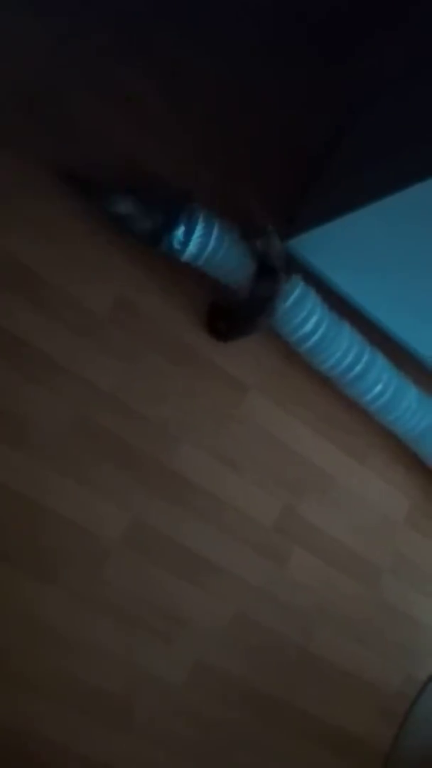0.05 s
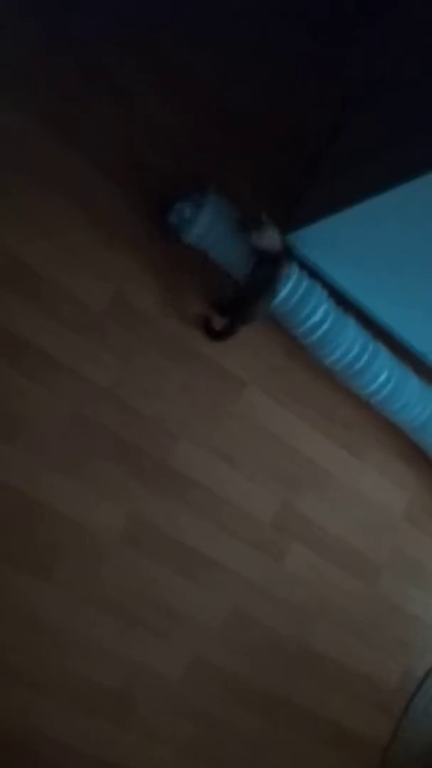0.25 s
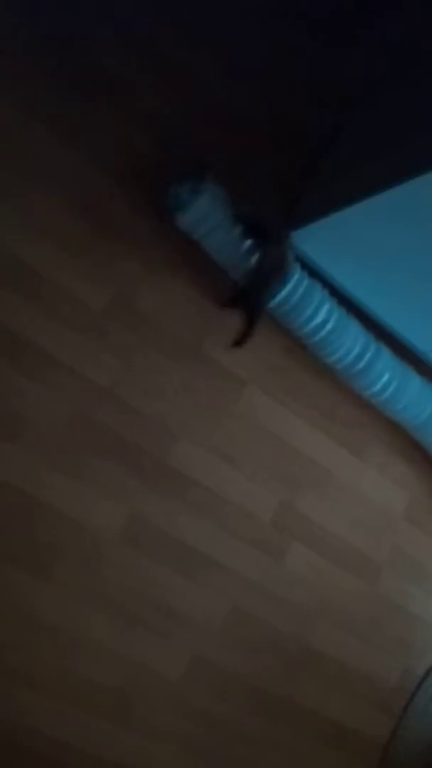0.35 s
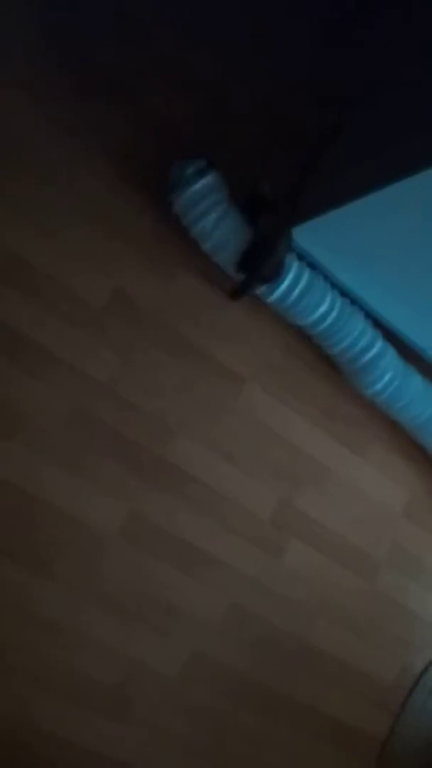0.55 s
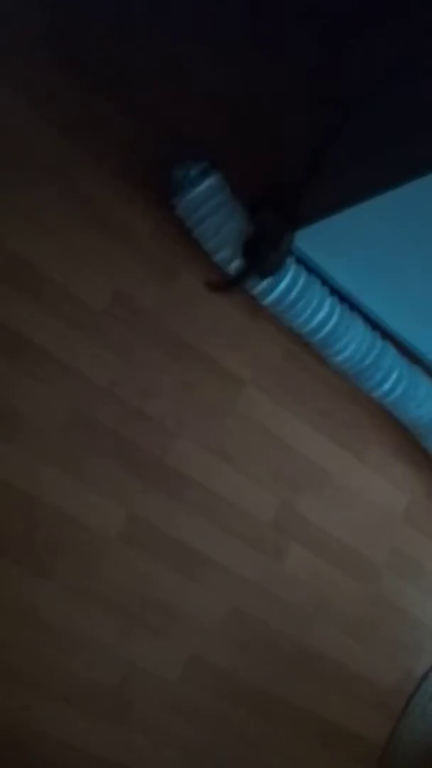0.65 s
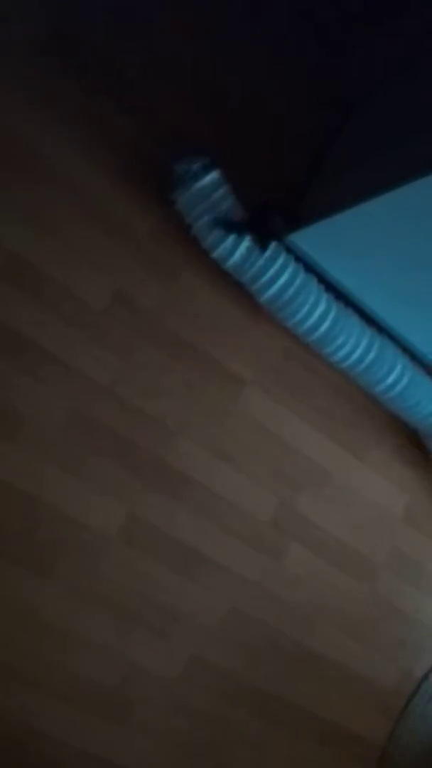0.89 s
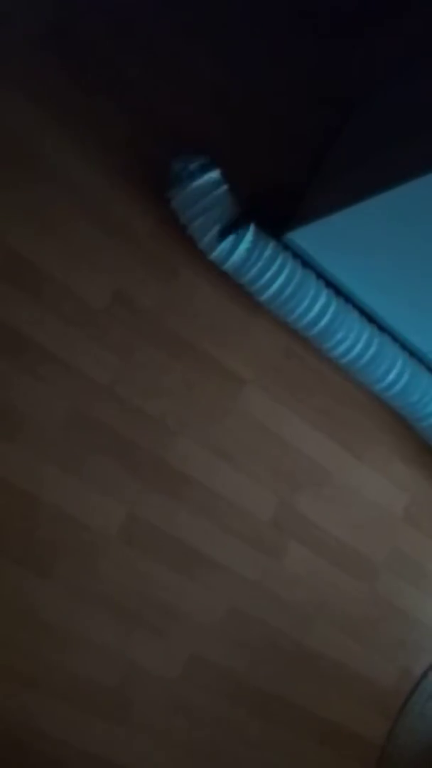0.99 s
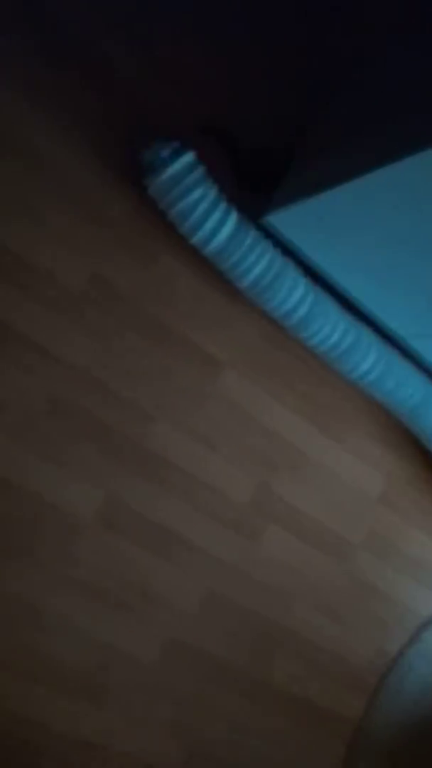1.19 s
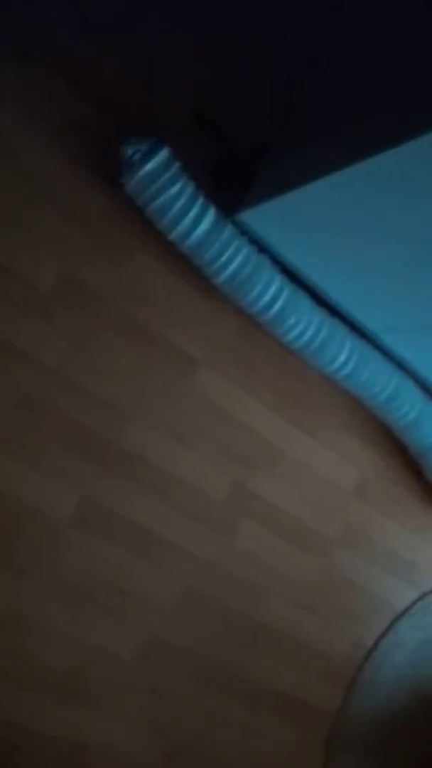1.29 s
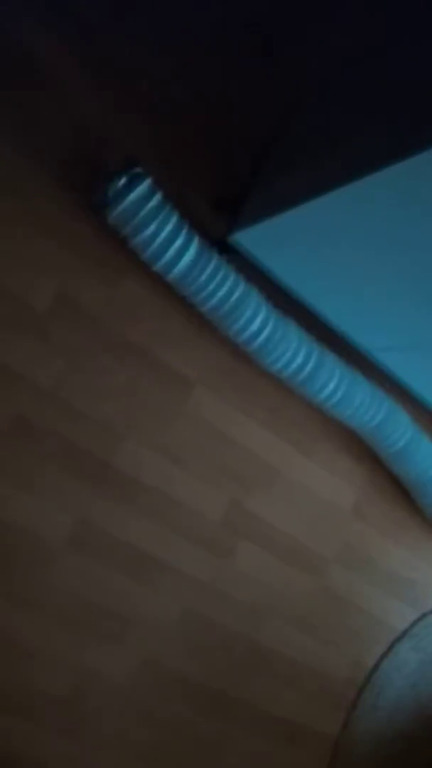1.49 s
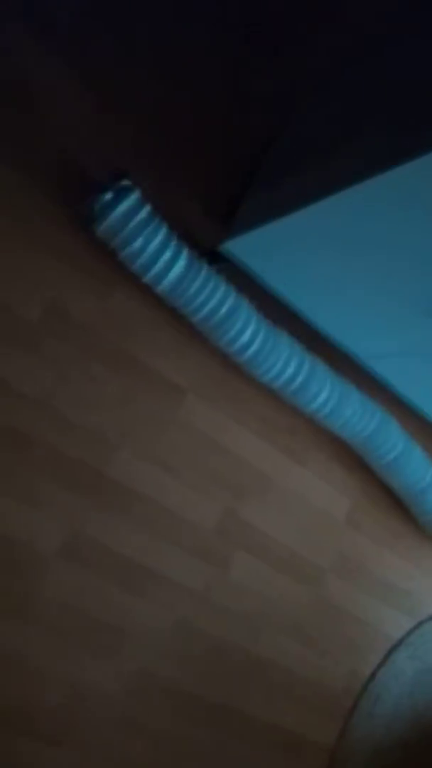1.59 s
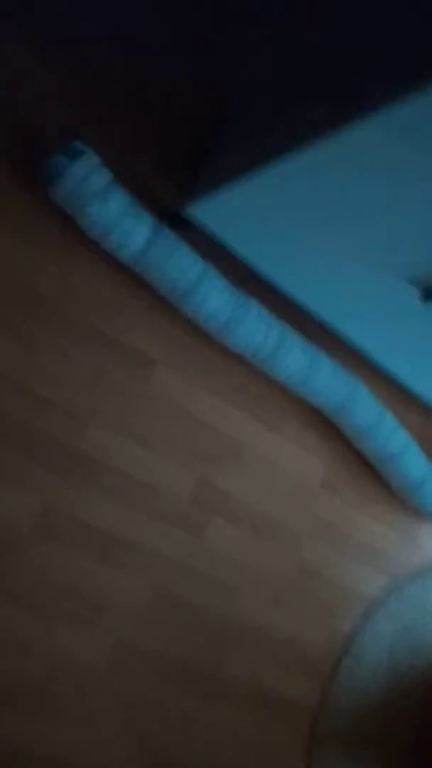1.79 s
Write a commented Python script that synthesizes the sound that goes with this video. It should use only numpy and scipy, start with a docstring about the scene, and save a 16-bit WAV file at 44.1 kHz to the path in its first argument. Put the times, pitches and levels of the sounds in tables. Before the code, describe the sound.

Crinkling, clicking plastic tube with claw scratches and hollow knocks from a ferret crawling inside.

```python
"""A quiet, bare room with a laminate floor, where a ferret scrambles through a ribbed plastic tube.
The tube's wall snaps and crinkles, claws scratch and knock on it, and paws thud through to the floor.
The air inside rings differently as the body moves along and plugs it.
The room blurs every blow into a short tail."""
import sys
import numpy as np
from scipy import signal
from scipy.fft import rfft, irfft
from scipy.io import wavfile

SR = 44100
rng = np.random.default_rng(int(sys.argv[2]) if len(sys.argv) > 2 else 0)


def wrap_up_sound(samples):
    """Save the sound to the file named by the first command line argument, as 16-bit audio."""
    columns = np.atleast_2d(samples).T
    # keep every value between -1 and 1, then stretch to whole-number steps
    tamed = np.clip(columns, -1, 1)
    steps = np.round(tamed * 32767).astype(np.int16)
    wavfile.write(sys.argv[1], SR, steps)


N = 81585

# The bright tone of the plastic wall: f/Hz, level/dB
WALL_TONE = [(760, -41.5), (1300, 0.5), (1890, -2.5), (4140, -8.5), (4560, -13), (5340, -8), (6750, -7.5),
             (8200, -6.5), (10200, 0), (11600, -1.5), (15500, -11), (16000, -8), (16500, -54)]
# The duller tone of the hollow tube: f/Hz, level/dB
HOLLOW_TONE = [(420, -7), (600, -9.5), (850, 2), (1120, -5.5), (1450, -6), (2000, -5), (2700, -14.5),
               (3600, -22.5)]
# The notes at which floor and tube ring under the paws: f/Hz, level/dB, time to fade by 60 dB/s
FLOOR_NOTES = [(103.7, -3.5, 0.24), (116, 0, 0.16), (137.3, 2, 0.109), (168.7, 0.5, 0.16),
               (209.8, 4, 0.058), (243.8, -2.5, 0.19), (297.8, 7.5, 0.079), (327.4, 6.5, 0.095),
               (369, 10.5, 0.07), (428, 7.5, 0.061), (505.7, 9, 0.048), (547.7, 6, 0.1), (616, 5, 0.07)]


def from_db(db):
    """Turn decibels into a number to multiply by."""
    return 10 ** (np.asarray(db) / 20)


def rms_one(x):
    """Scale a sound so that its average strength (rms) is 1."""
    return x / np.sqrt(np.mean(x ** 2) + 1e-20)


def at_hz(points, hz):
    """Read between the rows of a table, with frequency spaced by octaves."""
    freqs, values = np.transpose(points)
    return np.interp(np.log(hz), np.log(freqs), values)


def keep_range(x, kind, hz, order=3):
    """Keep the "low", "high" or "band" part of a sound; a higher order cuts more steeply."""
    return signal.sosfilt(signal.butter(order, hz, kind, fs=SR, output="sos"), x)


def colour(x, tone):
    """Give a sound the tone in a table, falling away steeply beyond its ends."""
    size = 4096
    (low, low_db), (high, high_db) = tone[0], tone[-1]
    table = [(low / 4, low_db - 40)] + list(tone) + [(high * 2, high_db - 30)]
    gains = from_db(at_hz(table, np.arange(size // 2 + 1) * SR / size + 1))
    # Folding the cepstrum (the log spectrum turned into time) stops any ringing ahead of a click.
    cepstrum = irfft(np.log(gains))
    cepstrum[1:size // 2] *= 2
    cepstrum[size // 2 + 1:] = 0
    response = irfft(np.exp(rfft(cepstrum)))
    response /= np.linalg.norm(response)
    return signal.fftconvolve(x, np.array(response, ndmin=x.ndim))[..., :x.shape[-1]]


def ring(clicks, hz, fade_s):
    """Each click starts a pure note that fades by 60 dB in fade_s."""
    decay, angle = from_db(-60 / (fade_s * SR)), 2 * np.pi * hz / SR
    return signal.lfilter([0, np.sin(angle)], [1, -2 * decay * np.cos(angle), decay ** 2], clicks + 1e-18)


def grains(per_s, spread_db):
    """Random clicks of uneven size."""
    sizes = from_db(spread_db * np.minimum(rng.exponential(1, N), 4)) * rng.choice([-1, 1], N)
    return rms_one(sizes * (rng.random(N) < per_s / SR))


def place(start_s, sound):
    """Put one short sound on a silent track."""
    out, i = np.zeros(N + SR), int(start_s * SR)
    out[i:i + len(sound)] = sound
    return out[:N]


def stereo_noise(size, fade_times):
    """Noise in half-octave bands, each fading at its own rate; the bass is alike in both ears."""
    # How alike left and right are in the room: f/Hz, likeness (0 to 1)
    likeness = [(100, 0.83), (250, 0.86), (500, 0.8), (1000, 0.06), (2000, 0.013), (8000, .0)]
    out, t, edges = 0, np.arange(size) / SR, 25 * 2 ** np.arange(0, 9.6, .5)
    white = rng.standard_normal((2, 2, size))
    for k, (low, high) in enumerate(zip(edges, edges[1:])):
        mid, side = keep_range(white[k % 2], "band", [low, high], order=2)
        hz = np.sqrt(low * high)
        alike = at_hz(likeness, hz)
        fade = from_db(-60 * t / at_hz(fade_times, hz))
        out += fade * (np.sqrt(1 + alike) * mid + np.sqrt(1 - alike) * side * [[1], [-1]])
    return out


def hush():
    """The faint, steady noise of the quiet room."""
    # Its tone: f/Hz, level/dB
    tone = [(25, -5), (55, 1.5), (110, -19), (220, -23), (330, -11), (550, 2), (800, -15),
            (2000, -10), (5500, -10.5), (9500, -9), (16000, -26)]
    steady = stereo_noise(N + SR // 4, fade_times=[(1, 1e9)])
    return from_db(-75.5) * rms_one(colour(steady, tone)[:, -N:])


def room(x, tail_db, build_s=0.0026):
    """The room's echoes alone: a smooth tail that builds up quickly and dies away."""
    # How long the room rings: f/Hz, time to fade by 60 dB/s
    fade_times = [(100, 0.19), (300, 0.26), (1000, 0.26), (3000, 0.23), (8000, 0.25), (14000, 0.27)]
    t = np.arange(SR // 2) / SR
    tail = stereo_noise(len(t), fade_times) * (1 - np.exp(-t / build_s)) ** 2
    tail *= from_db(tail_db) / np.sqrt(np.sum(tail ** 2) / 2)
    return signal.fftconvolve(np.atleast_2d(x).mean(0)[None], tail)[:, :N]


def floor_ring(pushes, strengths):
    """Pushes set all the floor's notes ringing, every other one upside down."""
    return sum((-1) ** k * from_db(db) * ring(pushes * strengths[k], hz, fade_s)
               for k, (hz, db, fade_s) in enumerate(FLOOR_NOTES))


def scratches(per_s=250, cycles=49):
    """Tiny claw ticks, each ringing a small patch of the wall at one of eight high pitches."""
    pitches_hz = np.geomspace(9700, 14200, num=8)
    rings = np.array([ring(grains(per_s / 8, spread_db=2.2), hz, cycles / hz) for hz in pitches_hz])
    ear_gains = rng.uniform(.3, 1, (2, 8))
    return rms_one(ear_gains @ rings)


def shuffle():
    """The tube drags: its wall crinkles, its hollow scuffs and the floor rumbles, while claws scratch."""
    # How strong the dragging is: t/s, treble level/dB, middle level/dB, bass level/dB
    drag_levels = [(0.0, -64, -81, -65), (0.118, -64.5, -84, -66), (0.164, -54.5, -80, -63),
                   (0.242, -46, -61, -50), (0.308, -50, -48.5, -49), (0.396, -48, -44.5, -43.5),
                   (0.55, -46.5, -47, -40), (0.72, -49, -42, -53.5), (0.896, -49.5, -48.5, -44.5),
                   (1.034, -50.5, -51.5, -53), (1.173, -49.5, -49, -56), (1.386, -59, -72, -67),
                   (1.484, -55, -62, -80), (1.618, -56.5, -56, -83), (1.726, -62, -64.5, -107),
                   (1.85, -88, -88, -92)]
    trims_db, tails_db = (-2.5, -11, -6.5), (16.5, 12, 4.5)   # treble, middle, bass
    times, *levels = np.transpose(drag_levels)
    treble, middle, bass = (from_db(np.interp(np.arange(N) / SR, times, db) + trim - tail)
                            for db, trim, tail in zip(levels, trims_db, tails_db))
    crinkle = treble * colour(np.array([grains(per_s=1100, spread_db=6) for _ in "LR"]), WALL_TONE)
    scuff = middle * colour(grains(per_s=500, spread_db=3), HOLLOW_TONE)
    rumble = bass * rms_one(floor_ring(grains(per_s=500, spread_db=1.5), np.ones(len(FLOOR_NOTES))))
    claws = treble * from_db(tails_db[0] - 11.5) * scratches()
    return claws + sum(x + room(x, db) for x, db in zip((crinkle, scuff, rumble), tails_db))


def thuds(push_s=0.0029, lead_s=0.01216, width_octaves=0.65, trim_db=-5.5):
    """A paw's soft push rings the floor notes near the pitch that suits its weight, never twice alike."""
    # Paws landing: t/s, level/dB, pitch/octaves above 100 Hz
    landings = [(0.067, -43, 1.57), (0.091, -43.5, 1.5), (0.192, -35.5, 1.13), (0.214, -38.5, 1.67),
                (.25, -42, 1.5), (0.314, -41, 2.22), (.37, -41.5, 1.4), (0.374, -42, 0.56),
                (0.411, -58, 0.41), (.43, -38, 1.16), (0.453, -40, 0.51), (0.477, -39, 2),
                (0.519, -31.5, 1.5), (0.535, -43.5, 0.93), (0.548, -36.5, 0.99), (0.569, -48, 1.8),
                (.61, -36.5, 1), (.676, -35.5, 1.47), (0.731, -41, 1.33), (0.769, -40.5, 2.26),
                (0.808, -37.5, 1.33), (0.839, -33.5, 1.94), (0.868, -36, 0.71), (0.901, -41, 0.14),
                (0.948, -39.5, 1.4), (0.986, -35.5, 1.91), (0.993, -39, 0.49), (1.049, -43.5, 1.8),
                (1.089, -44, 2), (1.148, -37.5, 1.09), (1.191, -49.5, 1.75), (1.358, -41, 2.15),
                (1.409, -44.5, 2.6), (1.44, -42, 2.92), (1.46, -72, 2), (1.492, -55, 2.3),
                (1.564, -53.5, 2.14)]
    spots = np.zeros((4, N))   # four spots take turns, each with its own room tail
    push = np.pad(np.hanning(int(push_s * SR) + 3), (0, 10000))
    octaves = np.log2(np.array(FLOOR_NOTES)[:, 0] / 100)
    for k, (s, db, pitch) in enumerate(landings):
        scatter = from_db(rng.normal(0, 2.03, len(FLOOR_NOTES)))
        nearness = np.exp(-.5 * ((octaves - pitch) / width_octaves) ** 2)
        thud = floor_ring(push, scatter * nearness)
        thud = keep_range(thud, "band", [100 * 2 ** (pitch - .9), 100 * 2 ** (pitch + .84)])
        start_s = s - lead_s / 2 ** pitch   # deeper thuds have their push start a little earlier, so each lands on its time
        spots[k % 4] += from_db(db + trim_db) * place(start_s, thud / np.abs(thud).max())
    return sum(x + room(x, tail_db=1) for x in spots)


def knocks(cycles=6.93, upper_ratio=1.757, trim_db=-2.5):
    """A claw hits the tube: a tick and two short, hollow notes whose pitch depends on the spot struck."""
    # Claw hits: t/s, level/dB, f/Hz, upper note/dB, tick/dB (the last two relative to the level)
    hits = [(0.045, -58.5, 2290, -24, 14), (0.071, -55.5, 1560, -12, 21), (0.19, -45.5, 1770, -10, 10),
            (0.237, -40, 560, -17, 14.5), (0.309, -43, 640, -15, -12), (0.329, -41, 626, -27, -8),
            (0.363, -38, 880, -8, 10.5), (0.379, -50, 555, 7, 5), (0.432, -43, 1270, 4, 19.5),
            (0.482, -31.5, 894, -14, 2), (0.52, -47.5, 696, -19, 24), (0.531, -32, 575, -1.5, 8.5),
            (0.538, -34.5, 660, -13, -1), (0.544, -36, 830, -19, -7), (0.604, -37, 535, -2, -3),
            (0.676, -39.5, 1770, -19, 17.5), (0.789, -38.5, 677, -8, 11), (0.84, -32, 650, -19, 10),
            (0.945, -41, 900, -20, -10), (0.992, -36.5, 590, -3.5, 3), (1.093, -45.5, 610, -29, 12),
            (1.152, -40, 900, -10, 5), (1.189, -41, 637, -2, -8), (1.304, -39, 660, -38, 11.5),
            (1.317, -49, 686, -11, 18.5), (1.335, -36.5, 2120, -21, -10), (1.352, -31, 738, -5.5, -6),
            (1.375, -44, 780, -6, -15), (1.479, -40.5, 830, -10, 0), (1.544, -39.5, 870, -16, 12),
            (1.647, -57, 770, -5, 7), (1.757, -52, 1490, -10, 1), (1.783, -45, 903, -4.5, 0)]
    notes, ticks = np.zeros((2, 3, N))   # three spots take turns, each with its own room tail
    click = signal.unit_impulse(6000)
    for k, (s, db, hz, upper_db, tick_db) in enumerate(hits):
        lower, upper = (keep_range(ring(click, f, cycles / f), "band", [f * 0.74, f * 1.51])
                        for f in (hz, hz * upper_ratio))
        notes[k % 3] += from_db(db) * place(s, lower + from_db(upper_db) * upper)
        ticks[k % 3] += place(s, [from_db(db + tick_db)])
    spots = from_db(trim_db) * (notes + colour(ticks, HOLLOW_TONE))
    return sum(x + room(x, tail_db=5.5) for x in spots)


def snaps(rise_s=0.00077, bounce_s=0.004, bounce_db=-7, trim_db=-1):
    """The wall snaps: a brief, bright crack, its bounce off the floor and then the room's tail."""
    # Snaps: t/s, level/dB, room tail relative to the crack/dB, lowest f/Hz, length/s
    wall_snaps = [(0.0493, -49.5, 4.5, 8300, 0.0047), (0.0713, -47, 5, 4860, 0.0026),
                  (0.16, -58, -9, 6000, .002), (0.199, -47, 3.5, 6000, 0.0024),
                  (0.226, -32, -1.5, 8600, 0.0023), (0.242, -37, -12, 6500, 0.0026),
                  (0.3446, -45, 9, 5000, 0.0011), (0.375, -41.5, -3, 5000, .003),
                  (0.4312, -29.5, -4.5, 6000, 0.0021), (0.4827, -45, 8, 5000, 0.0029),
                  (0.517, -36.5, 1, 6000, 0.0034), (0.672, -41.5, 4, 3950, 0.0032),
                  (0.716, -38, -8, 6000, 0.0028), (0.787, -47, 6.5, 5000, .003),
                  (0.8402, -29, -4, 4460, 0.0029), (0.9695, -34, -4, 8000, 0.0027),
                  (0.9922, -36.5, -3, 5000, 0.0038), (1.1027, -49.5, 6.5, 5000, 0.0028),
                  (1.15, -41, 3, 7000, 0.0055), (1.3236, -44.5, -1.5, 5900, 0.0033),
                  (1.3515, -27.5, -2.5, 4440, 0.0025), (1.355, -30.5, -2, 7500, 0.0019),
                  (1.523, -53, 3.5, 7140, 0.0033), (1.5383, -45.5, 2, 5100, .003),
                  (1.5436, -34.5, -2.5, 4000, 0.0021), (1.568, -50, -12, 8000, 0.0009),
                  (1.726, -57, 3.5, 4940, 0.0029)]
    t, cracks, room_clicks = np.arange(1000) / SR, 0, 0
    for s, db, tail_db, low_hz, length_s in wall_snaps:
        noise = np.sign(rng.standard_normal((2, len(t))))
        outline = np.minimum(t / rise_s, 1) * np.exp(-(t / length_s) ** 1.74)
        crack = keep_range(from_db(db + trim_db) * outline * noise, "high", low_hz, order=2)
        cracks += np.array([place(s, ear) + from_db(bounce_db) * place(s + bounce_s, ear)
                            for ear in crack])
        room_clicks += place(s, [from_db(db + trim_db + tail_db) * np.sqrt(length_s * SR)])
    return colour(cracks + room(room_clicks, tail_db=0, build_s=0.0055), WALL_TONE)


def tube_air(x, fade_s=0.049):
    """The air in the tube boosts some pitches and cancels others, depending on where the body plugs it."""
    # Peaks and dips in the tone: start/s, end/s, f/Hz, width/Hz, gain/dB
    peaks_and_dips = [(0, .23, 710, 149, -7), (0, .23, 1043, 59.6, 8.5), (0, .23, 1316, 202, -29),
                      (0, .23, 1494, 80.5, 7), (0, .23, 1700, 120, -16), (0, .3, 2040, 80, 4),
                      (1.44, 1.9, 770, 39.4, 5.5), (1.698, 1.9, 927, 35, 8.5), (1.504, 1.9, 1080, 250, -17),
                      (1.61, 1.9, 1480, 117.5, 5.5), (1.536, 1.7, 2160, 78, 4)]
    t = np.arange(N) / SR
    for start, end, hz, width_hz, gain_db in peaks_and_dips:
        decay = np.exp(-np.pi * width_hz / SR)
        feedback = [1, -2 * decay * np.cos(2 * np.pi * hz / SR), decay ** 2]
        narrow_band = signal.lfilter(np.array([1, 0, -1]) * (1 - decay ** 2) / 2, feedback, x)
        share = np.clip(np.minimum(t - start, end - t) / fade_s + 1, 0, 1)
        x = x + share * (from_db(gain_db) - 1) * narrow_band
    return x


def scene():
    """The ferret's scramble, with its deep bass thinned, over the room's hush."""
    background = hush()
    ferret = tube_air(snaps() + knocks() + thuds() + shuffle())
    ferret *= from_db([[.35], [-.35]])   # a little to the left
    upper = keep_range(ferret, "high", hz=67, order=4)
    deep = keep_range(ferret, "low", hz=60, order=2)
    return background + upper + from_db(-1.5) * deep


def record(dry, cutoff_hz=16700):
    """Cut away the very highest treble."""
    return signal.sosfilt(signal.cheby2(12, 70, cutoff_hz, fs=SR, output="sos"), dry)


dry = scene()
out = record(dry)
wrap_up_sound(out)
```